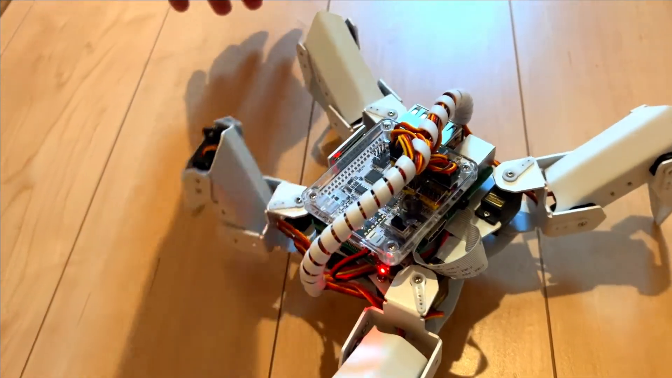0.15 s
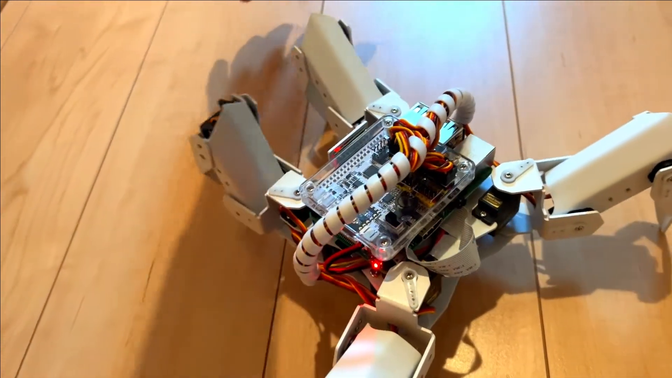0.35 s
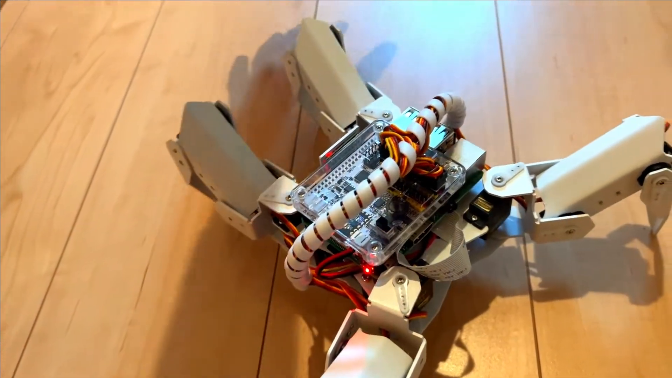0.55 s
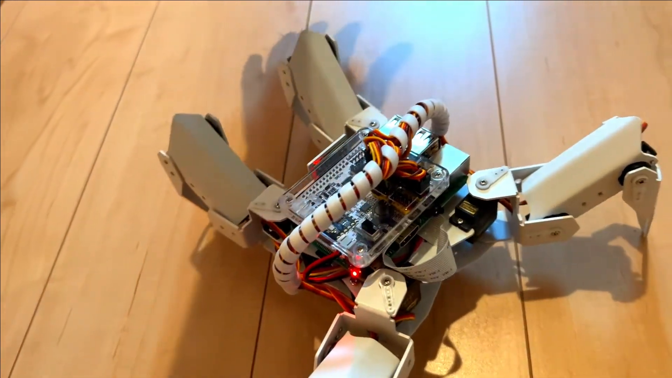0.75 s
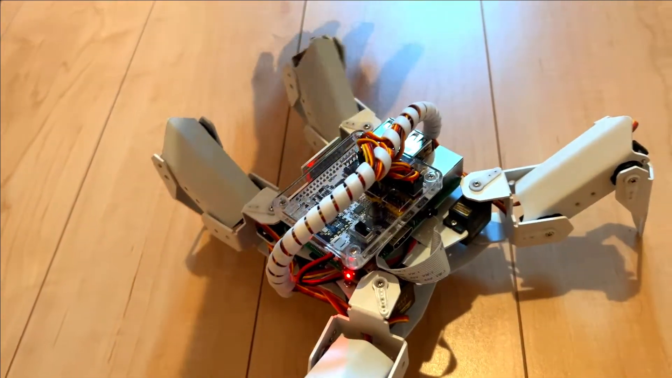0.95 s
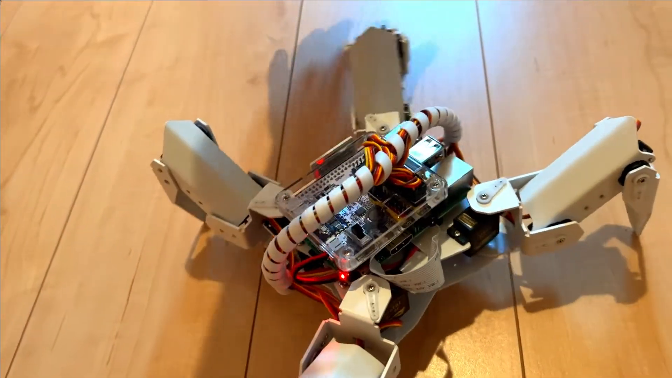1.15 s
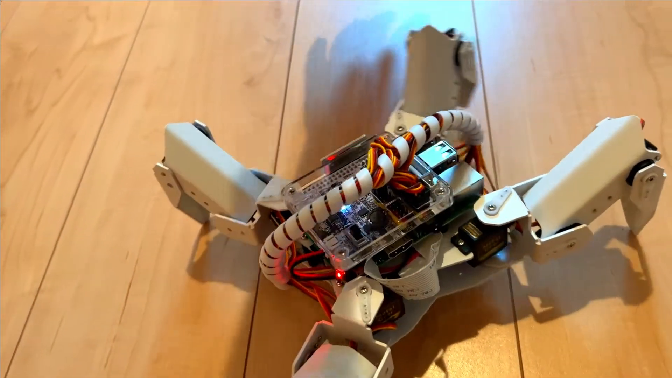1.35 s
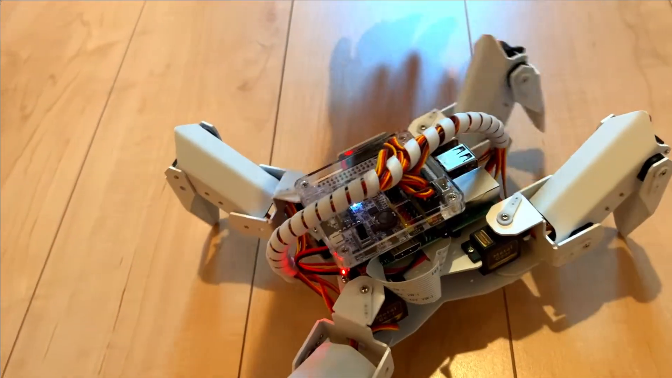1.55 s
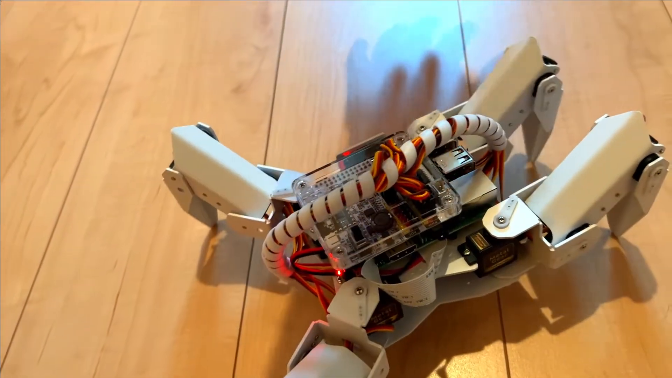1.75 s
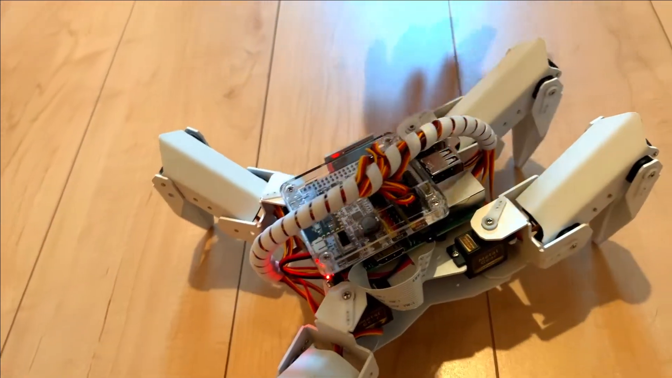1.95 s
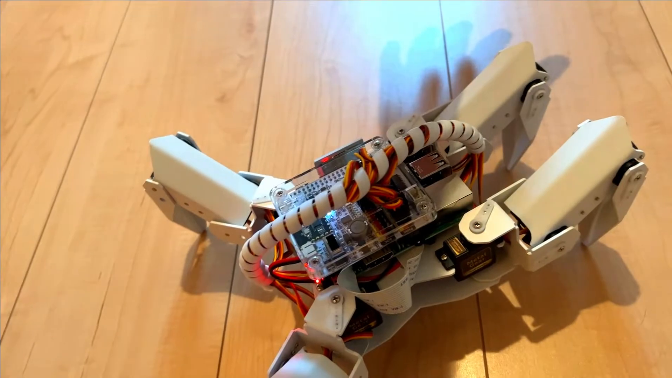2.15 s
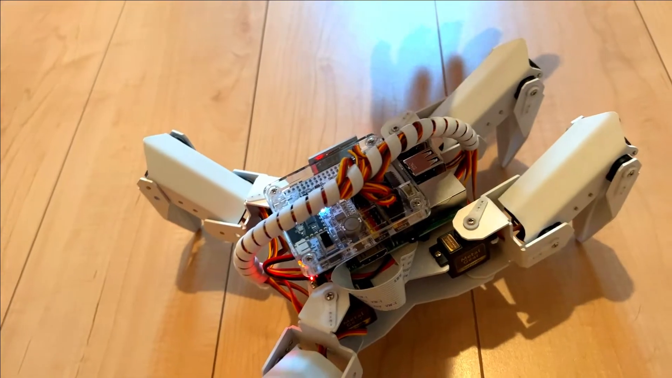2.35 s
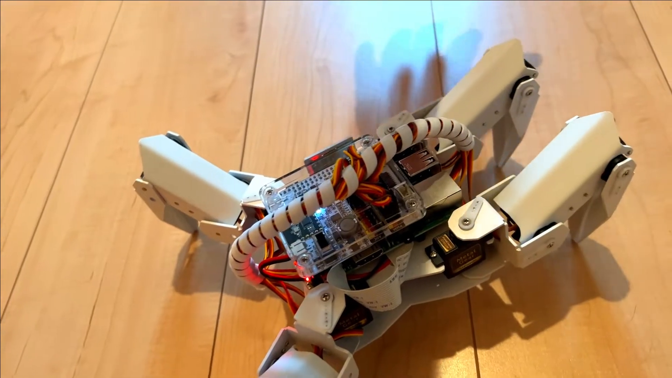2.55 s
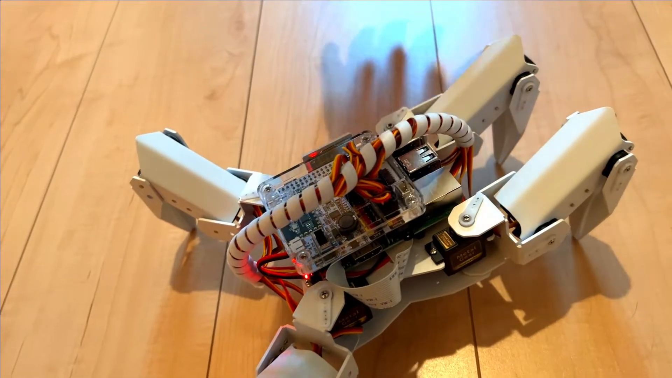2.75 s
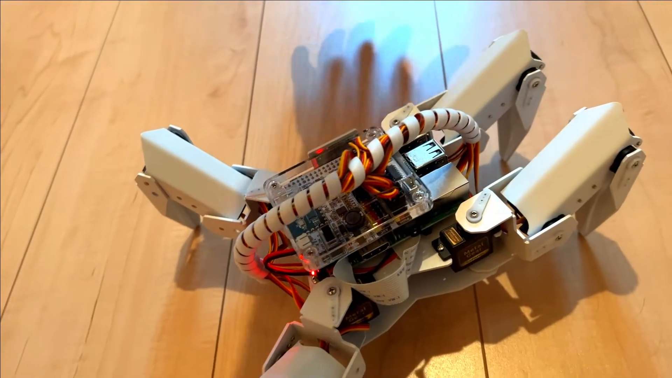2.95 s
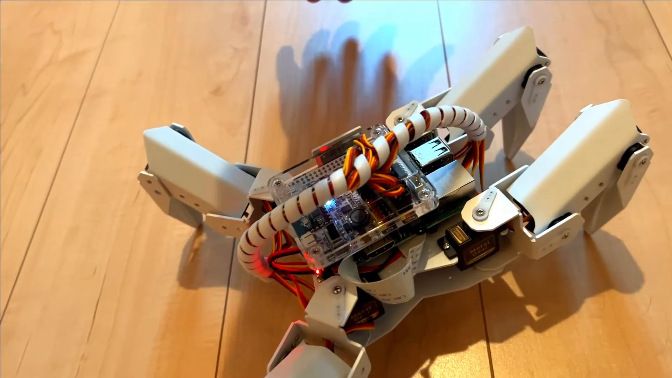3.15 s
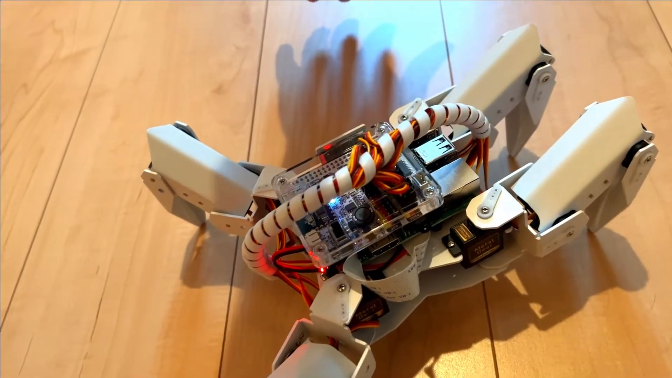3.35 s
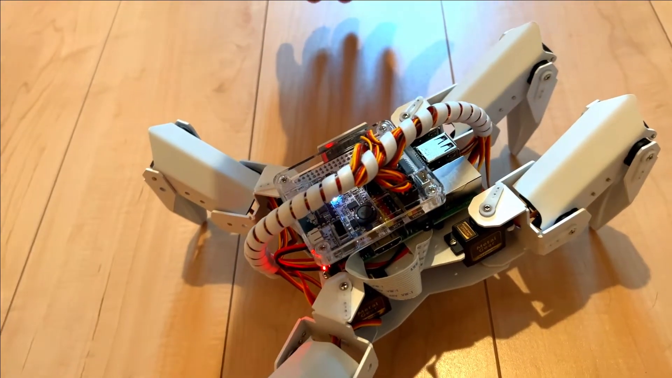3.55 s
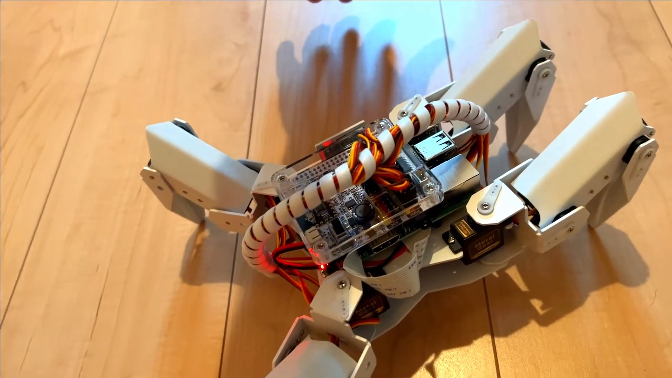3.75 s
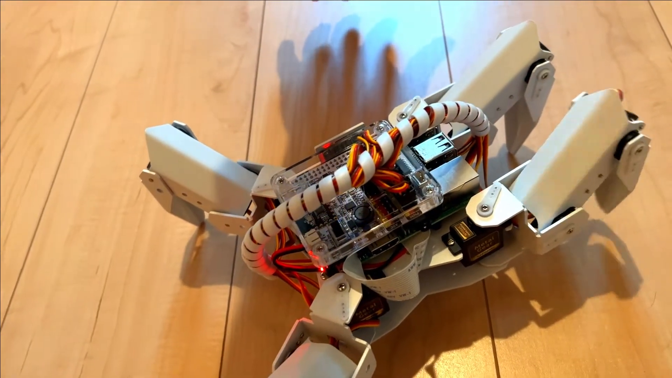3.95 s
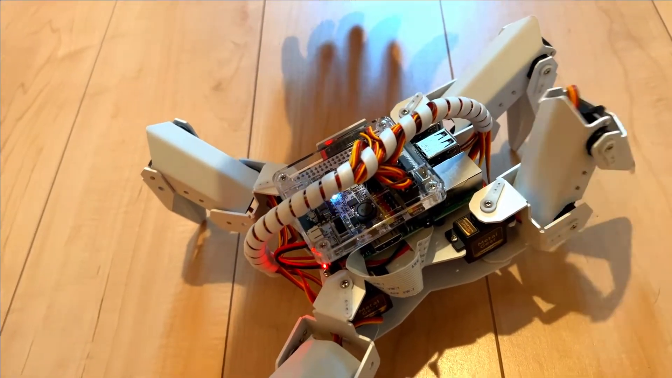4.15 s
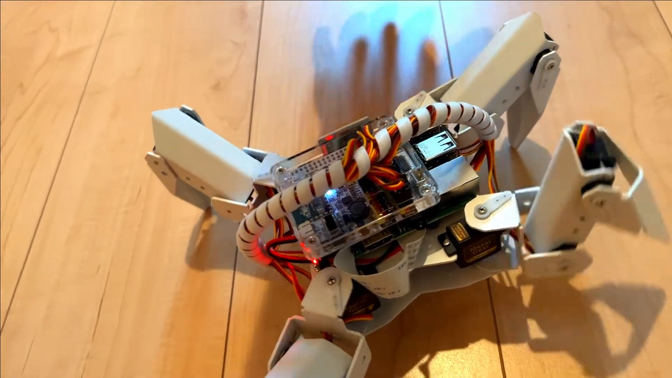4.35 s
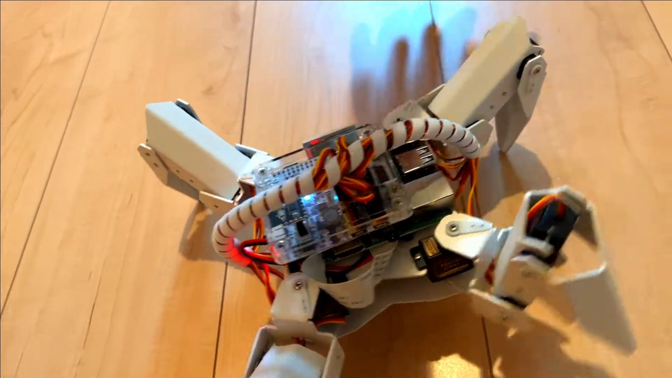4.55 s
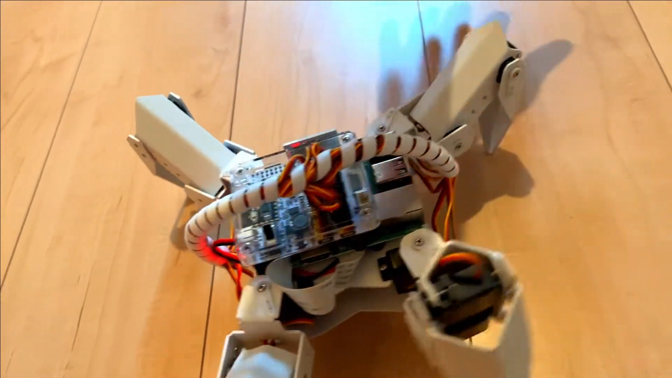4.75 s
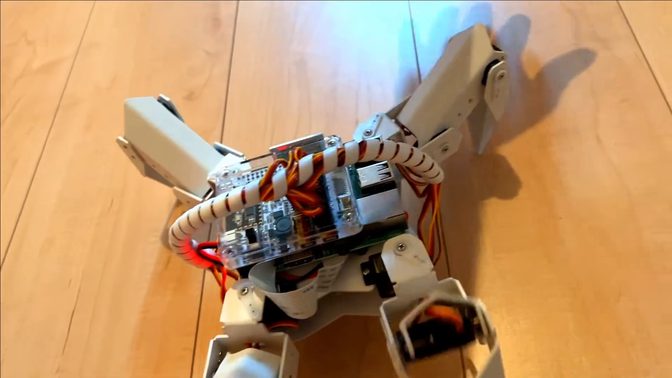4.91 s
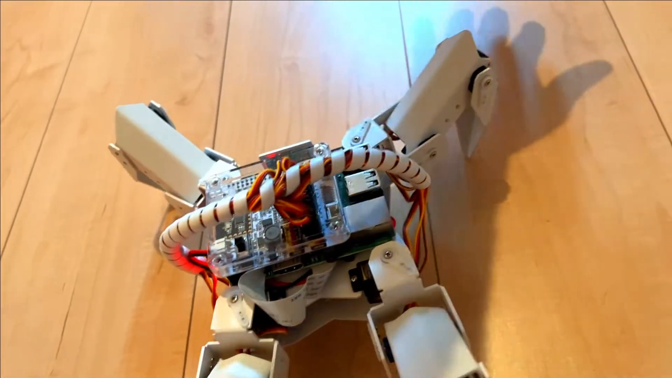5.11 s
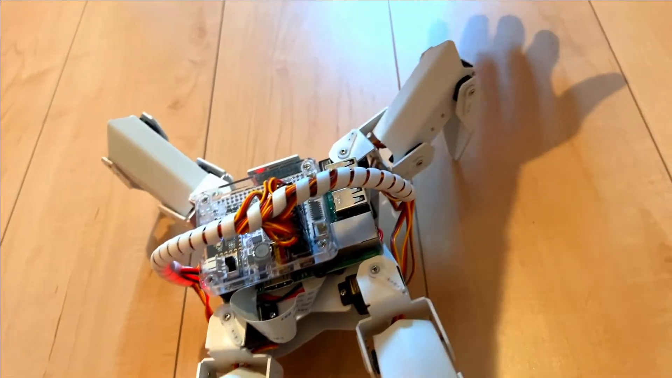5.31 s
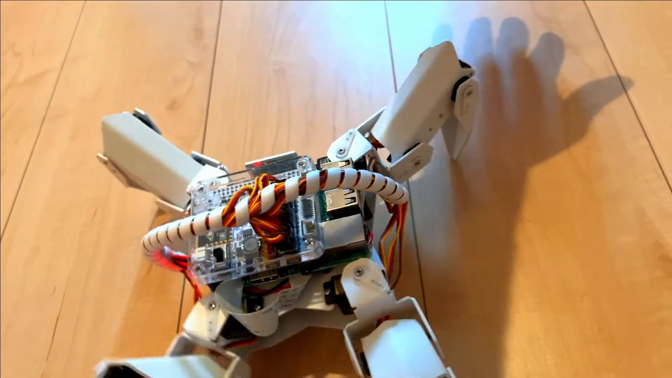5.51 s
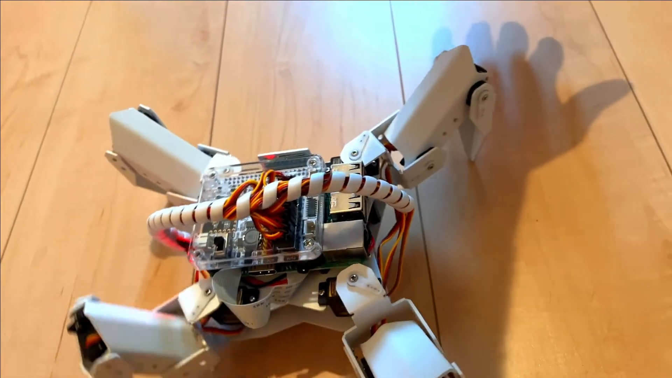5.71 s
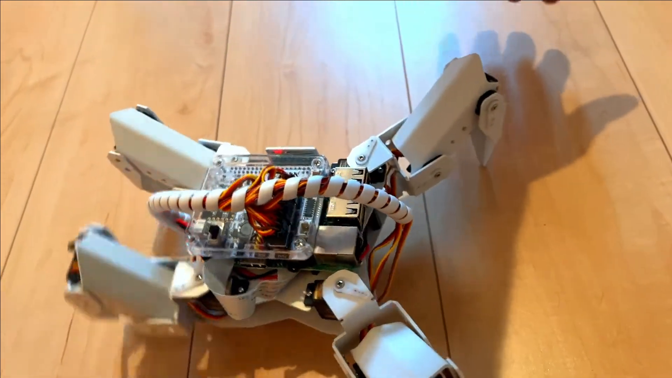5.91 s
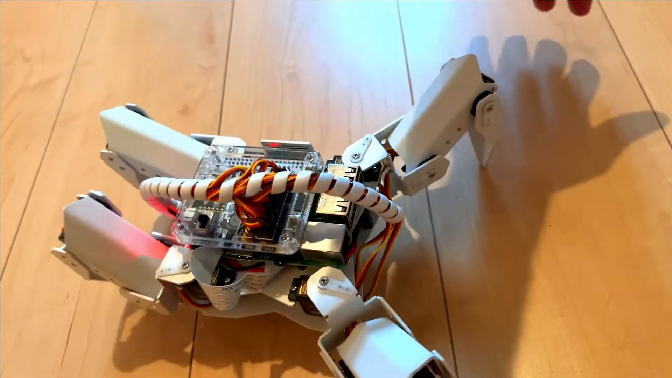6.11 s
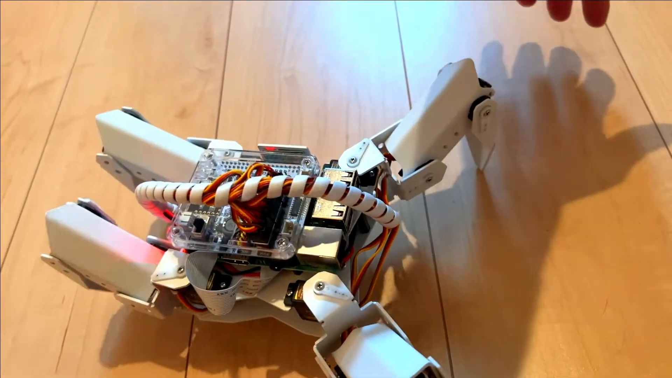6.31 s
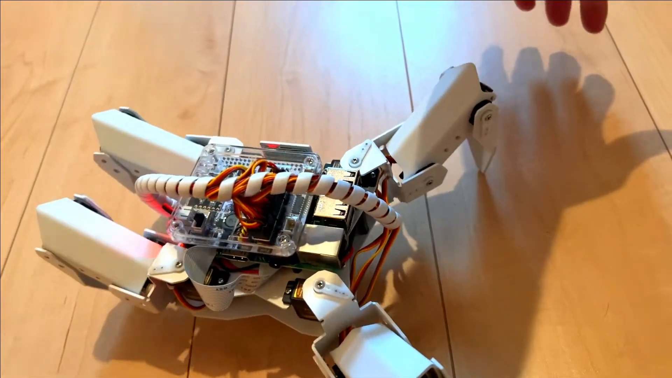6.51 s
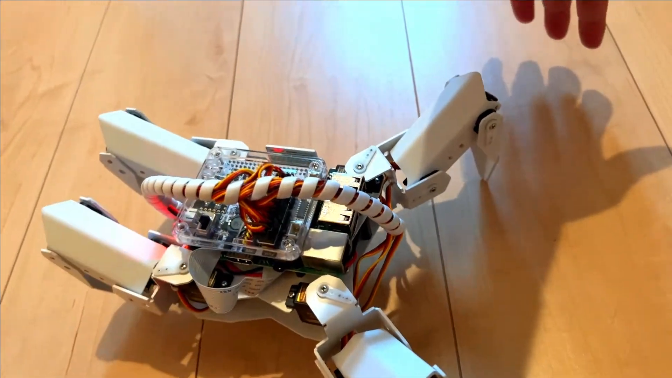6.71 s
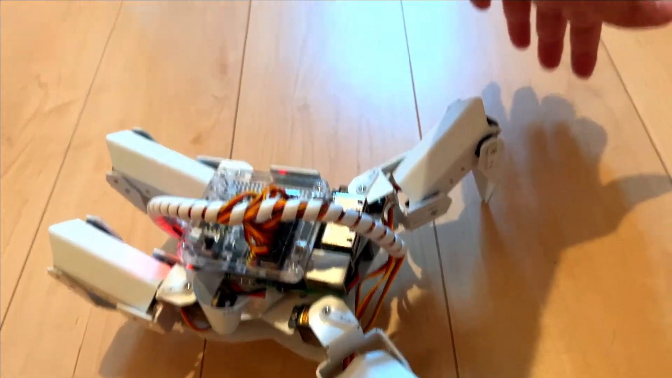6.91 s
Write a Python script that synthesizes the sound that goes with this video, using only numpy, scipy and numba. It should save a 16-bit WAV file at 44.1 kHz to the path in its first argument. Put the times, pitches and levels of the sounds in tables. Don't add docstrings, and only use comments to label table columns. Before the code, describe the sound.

Close indoor sound of hobby servos: dry, buzzing plastic gears start and stop abruptly, with clicks at each jerk. Feet skid softly and land with low woody booms and hard plastic cracks. After the first strides there is a quiet pause with a faint high-pitched electrical whine, then a slow ratcheting movement, several quick strokes, and a last few landings before near silence. Short room echo.

```python
import sys
import numpy as np
from scipy import signal
from scipy.fft import rfft, irfft, next_fast_len
from scipy.io import wavfile
from scipy.ndimage import map_coordinates
from numba import njit

SR = 44100
rng = np.random.default_rng(int(sys.argv[2]) if len(sys.argv) > 2 else 0)


def undo_db(level):
    steps = np.asarray(level, float) / 20
    return 10 ** steps


def int16_out(signal):
    q = np.round(np.clip(np.atleast_2d(signal).T, -1, 1) * 32767)
    wavfile.write(sys.argv[1], SR, q.astype(np.int16))


N = 311787
SIZE = next_fast_len(N + SR)
HZ = np.maximum(np.arange(SIZE // 2 + 1) * SR / SIZE, 1)


def rms_one(x):
    return x / np.sqrt(np.mean(x ** 2) + 1e-20)


def at_hz(points, hz):
    points = np.array(points)
    return np.interp(np.log(hz), np.log(np.maximum(points[:, 0], 1)), points[:, 1])


def colour(x, points):
    return rms_one(irfft(rfft(x, SIZE) * undo_db(at_hz(points, HZ)), SIZE)[..., :N])


def drift(rate_hz):
    knots = rng.standard_normal(600)
    coarse = map_coordinates(knots, [np.arange(0, N + 64, 64) / SR * rate_hz * 2], order=2) * 1.2
    return np.interp(np.arange(N) / 64, np.arange(len(coarse)), coarse)


def contacts(per_s, spread_db):
    sizes = undo_db(spread_db * np.minimum(rng.exponential(1, N), 4)) * rng.choice([-1, 1], N)
    return rms_one(sizes * (rng.random(N) < per_s / SR))


def ring(clicks, hz, t60_s):
    r, w = undo_db(-60 / (t60_s * SR)), 2 * np.pi * hz / SR
    return signal.lfilter([0, np.sin(w)], [1, -2 * r * np.cos(w), r * r], clicks + 1e-18)


@njit
def glide(x, pull, r):
    y = np.zeros(len(x))
    for i in range(2, len(x)):
        y[i] = x[i] - x[i - 2] + pull[i] * y[i - 1] - r * r * y[i - 2]
    return y


def housing(x, hz, width_hz):
    r = np.exp(-np.pi * width_hz / SR)
    return rms_one(glide(x, 2 * r * np.cos(2 * np.pi * hz / SR) + 0 * x, r))


def ports(x, pan_db, count):
    return np.array([x * undo_db(pan_db / 2), np.roll(x, count) * undo_db(-pan_db / 2)])


def played(rows, rise_db_per_s, fall_db_per_s):
    start, end, db, *columns = np.transpose(rows)[:, :, None]
    t = np.arange(0, N + 64, 64) / SR
    early_db = rise_db_per_s * np.maximum(start - t, 0)
    late_db = fall_db_per_s * np.maximum(t - end, 0)
    power = undo_db(2 * np.maximum(db - early_db - late_db, -140))
    total = power.sum(0)
    curves = [10 * np.log10(total)]
    curves += [(c * power).sum(0) / total for c in columns]
    return [np.interp(np.arange(N) / SR, t, c) for c in curves]


# start in s, end in s, grind in dB, low housing in Hz, high housing in Hz.
STROKES = [(0, .34, -47, 5290, 8030), (.39, .66, -46.5, 5300, 8090), (.7, .78, -46.5, 5190, 7450),
           (.88, 1.3, -46, 5160, 7800), (1.33, 1.6, -44.5, 5050, 7680), (1.68, 1.86, -44, 4740, 8120),
           (3.91, 4.2, -46, 6090, 7840), (4.23, 4.82, -49.5, 5050, 8150), (4.9, 5.08, -46.5, 6230, 7700),
           (5.12, 5.33, -48.5, 5000, 8060), (5.45, 5.66, -46, 5430, 7680), (5.7, 6.0, -44.5, 5300, 7930),
           (6.1, 6.2, -62.5, 4840, 7630), (6.25, 6.44, -60, 5700, 7380), (6.48, 6.58, -58, 5440, 7580)]
SPIN_UP_DB_PER_S, SPIN_DOWN_DB_PER_S = 641.5, 129.5
# start in s, end in s, relative level in dB.
SHELL = [
    (0, 1.6, -5),
    (1.65, 3.1, -4),
    (3.85, 5, 7),
    (4.9, 4.82, 6),
    (5.45, 6.9, -2),
    (6.2, 6.4, 7),
]
# frequency in Hz, level in dB per Hz.
GEAR_BODY = [(1500, -43), (2600, -10.5), (3700, -4.5), (5200, -0.5), (6900, -0.5), (8000, -2), (9200, 2.5),
             (10500, -28), (13000, -47)]
# frequency in Hz, level in dB per Hz.
FIZZ_BODY = [(8500, -30), (10000, -1), (11200, 1), (12600, -1), (13400, -14), (15900, -40)]
# frequency in Hz, level in dB per Hz.
FIZZ_TOP = [(12300, -25), (13300, 0), (14200, -3), (15500, -2), (15900, -28)]
# frequency in Hz, relative level in dB.
PANELS = [(1950, -33), (3300, -28), (3600, -23), (4130, -25), (4730, -20), (5160, -19), (5600, -20),
          (6100, -20), (6600, -22), (7350, -20), (8150, -19), (8550, -21)]
FULL_GRIND_DB, FIZZ_STOPS_DB = -46.5, -13


def gears():
    grind_db, low_hz, high_hz = played(STROKES, SPIN_UP_DB_PER_S, SPIN_DOWN_DB_PER_S)
    shell_db, = played(SHELL, 150, 150)
    swing_db = grind_db - FULL_GRIND_DB
    slack_db = np.clip(swing_db, -25, 0)
    torque, out = jerks()
    effort = np.hypot(undo_db(grind_db - 7.5 + 1.0 * drift(22)), 0.5 * torque)
    teeth = [contacts(3000, 1.8) for servo in range(3)]

    out += effort * undo_db(-0.5) * ports(colour(contacts(5000, 1.9), GEAR_BODY), .4, count=0)
    low = housing(teeth[0], low_hz, width_hz=260)
    out += effort * undo_db(-8 + 3.0 * drift(14)) * ports(low, 1.5, count=1)
    high = housing(teeth[1], high_hz, width_hz=350)
    out += effort * undo_db(-9 + 0.4 * slack_db + 3.0 * drift(14)) * ports(high, -.5, count=0)
    shell = housing(housing(teeth[2], 2300, width_hz=820), 2240, width_hz=600)
    shell_db = shell_db - 22 - 0.3 * slack_db + 3.1 * drift(4.0)
    out += effort * undo_db(shell_db) * ports(shell, -0.5, count=2)

    fizz_db = np.minimum(-5 - 0.44 * swing_db, 1.5) + 2 * np.minimum(slack_db - FIZZ_STOPS_DB, 0)
    out += effort * undo_db(fizz_db) * ports(colour(contacts(4000, 6.0), FIZZ_BODY), .1, count=0)
    top_db = -7 + 1.6 * slack_db + 3.0 * drift(6.7)
    out += effort * undo_db(top_db) * ports(colour(contacts(5500, 4.2), FIZZ_TOP), .1, count=0)

    for k, (hz, db) in enumerate(PANELS):
        wander_hz = hz * (1 + 0.014 * drift(5.5))
        panel = housing(teeth[k % 3], wander_hz, width_hz=70)
        out += effort * undo_db(db + 4 + 4.5 * drift(25)) * ports(panel, .5, count=(hz < 6000) * (k % 3))
    return out


# time in s, peak in dB, housing in Hz.
JERKS = [(0.0318, -41.5, 5970), (0.192, -44, 4600), (0.378, -39, 5800), (0.4294, -33, 5300),
         (0.5074, -36, 5170), (0.6484, -37.5, 7840), (0.8934, -37.5, 5100), (0.9812, -30.5, 7740),
         (1.0236, -30.5, 7550), (1.1258, -36, 7260), (1.1538, -43, 5230), (1.3094, -35.5, 7740),
         (1.3848, -46, 5470), (1.6402, -40.5, 4240), (1.701, -36.5, 4460), (1.8672, -39, 5630),
         (4.0392, -40.5, 5340), (4.2353, -36, 8200), (4.9132, -38.5, 4070), (4.9791, -34, 4200),
         (5.0429, -37.5, 4150), (5.47, -34, 7390), (5.5203, -34.5, 6160), (5.6326, -34, 8050),
         (5.7229, -36.5, 6800), (5.7693, -36, 8100), (5.8194, -32, 8260), (5.8914, -31, 8560)]
# time in s, peak in dB, low and high housing in Hz.
STUTTERS = [(4.282, -49, 4760, 8600), (4.3291, -38, 4950, 7960), (4.3739, -38.5, 4640, 8200),
            (4.4159, -39.5, 4940, 8300), (4.4594, -53, 5480, 7580), (4.5, -39, 5600, 8080),
            (4.5462, -48, 5460, 8200), (4.5846, -38.5, 5030, 8380), (4.6264, -42.5, 5300, 7640),
            (4.6645, -38.5, 6260, 7860), (4.708, -41.5, 5520, 7650), (4.7506, -36.5, 5900, 7400),
            (4.796, -38.5, 5300, 7500)]


def jerks():
    commands = list(JERKS)
    commands += [(s, db, hz) for s, db, *housings in STUTTERS for hz in housings]
    torque, out, t = np.zeros(N), np.zeros((2, N)), np.arange(SR // 8) / SR
    for s, db, hz in commands:
        i = round((s - .003) * SR)
        swell = undo_db(db - 15.0) * t / 0.0039 * np.exp(1 - t / 0.0062)
        rattle = housing(rng.standard_normal(len(t)), hz, width_hz=130)
        torque[i:i + len(t)] += swell
        out[:, i:i + len(t)] += undo_db(-0.5) * swell * ports(rattle, 1.8, count=0)
    return torque, out


# start in s, end in s, rumble in dB, chassis and leg scrape in dB relative to it.
DRAGS = [(0, .1, -40, -7.5, -17.5), (.15, .36, -45.5, -6.5, -17.5), (.52, .66, -62, -1.5, -5),
         (.85, .9, -55.5, -2.5, -9), (1.0, 1.09, -45, -8.5, -24), (1.15, 1.22, -52.5, -5.5, -17),
         (1.38, 1.51, -41, -6.5, -17), (1.53, 1.65, -39, -7.5, -15), (1.9, 1.97, -46.5, -21, -14),
         (3.91, 4.06, -74.5, 16.5, 2.5), (4.09, 4.2, -73.5, 13.5, 3), (4.25, 4.31, -48.5, -1, -10),
         (4.36, 4.5, -46, -6, -17.5), (4.55, 4.74, -44.5, -10, -21.5), (4.8, 4.9, -48.5, -9.5, -27.5),
         (5.1, 5.18, -58.5, -1.5, -10.5), (5.4, 5.55, -57, -2.5, -6), (5.62, 5.71, -47, -8.5, -26),
         (5.76, 5.81, -54, -7, -27), (5.86, 5.89, -57, -5, -14), (5.91, 5.935, -51, 3, -5),
         (5.98, 6.05, -45, -6, -17), (6.4, 6.54, -46.5, -8, -23.5), (6.6, 6.64, -61.5, -5, -12)]
# frequency in Hz, level in dB, t60 in s.
SKID_BOARDS = [(163, -9.5, 0.24), (208, -4.5, 0.2), (230.3, -9.5, 0.14), (274, -6.5, 0.084)]
# frequency in Hz, level in dB, t60 in s.
SKID_CHASSIS = [(330, -5, 0.071), (394.5, 0, 0.055), (420, -2, 0.052), (477, -7.5, 0.013),
                (570, -8.5, 0.02)]
# frequency in Hz, level in dB, t60 in s.
SKID_LEG = [(694, -3.5, 0.062), (924, 2, 0.032), (1014, -3.5, .05), (1071, -7, .05), (1270, -7.5, .04),
            (1440, -11.5, 0.052)]
GRIP_DB_PER_S, SLIP_OFF_DB_PER_S = 297.5, 218.5


def dragging():
    rumble_db, chassis_db, scrape_db = played(DRAGS, GRIP_DB_PER_S, SLIP_OFF_DB_PER_S)
    slips, out = contacts(2500, 1.8), 0
    dealt = rng.integers(0, len(SKID_LEG), N)
    for modes, rel_db in ((SKID_BOARDS, 0), (SKID_CHASSIS, chassis_db), (SKID_LEG, scrape_db)):
        body = 0
        for k, (hz, db, t60_s) in enumerate(modes):
            body = body + undo_db(db) * ring(slips * (dealt == k), hz, t60_s)
        out = out + undo_db(rel_db) * rms_one(body)
    return undo_db(rumble_db - 3.5 + 2.0 * drift(15)) * out


DRIVER_HZ = [15630, 15610, 15619, 15689, 15674]
# start in s, end in s, level in dB.
LOADS = [
    [(0, 2.3, -74), (1.95, 1.5, -60.5), (2.4, 2.7, -59.5), (3.15, 4.4, -59.5), (4.4, 5, -60),
     (5.35, 6.1, -59), (6.1, 6.7, -64.5), (6.8, 6.8, -67)],
    [(2.2, 3.2, -63.5), (3.3, 4.17, -63.5), (5.9, 6.1, -67.5)],
    [(0, .4, -65), (.95, 1.46, -57), (1.55, 2.0, -57), (5.4, 5.7, -59.5), (6.05, 6.4, -61), (6.8, 7.1, -57)],
    [(0, .8, -69), (.88, 1.35, -62.5), (3.9, 5.1, -66), (5.35, 6.55, -63.5), (6.8, 7.1, -75)],
    [(1.5, 1.93, -70), (2.0, 3.0, -77.5)],
]
LOAD_ON_DB_PER_S, LOAD_OFF_DB_PER_S = 57.5, 57


def drivers():
    tones = 0
    for hz, loads in zip(DRIVER_HZ, LOADS):
        db, = played(loads, LOAD_ON_DB_PER_S, LOAD_OFF_DB_PER_S)
        phase = 2 * np.pi * np.cumsum(hz + 0.87 * drift(3)) / SR
        tones = tones + np.sqrt(2) * undo_db(db + 8.0 + 1.1 * drift(6)) * np.sin(phase)
    haze = housing(housing(rng.standard_normal(N), 15640, width_hz=300), 15640, width_hz=300)
    grind_db = played(STROKES, SPIN_UP_DB_PER_S, SPIN_DOWN_DB_PER_S)[0]
    return ports(tones + (undo_db(grind_db - 14) + undo_db(-81.0)) * haze, 0, count=0)


# frequency in Hz, level in dB per Hz.
HUM = [(12, -48.5), (30, -8.5), (85, -2), (300, -18.5), (324, -15), (369, -13.5), (602, -29.5),
       (667, -29.5), (1300, -34), (10500, -49.5), (12400, -69), (20900, -120)]
# frequency in Hz, likeness from 0 to 1.
HUM_LIKENESS = [(60, .9), (290, 0.77), (640, .38), (1400, 0.11), (15000, .1)]
HUM_DB = -64.5


def hum():
    alike = np.clip(at_hz(HUM_LIKENESS, HZ), 0, 1)
    mid, side = rfft(rng.standard_normal((2, SIZE)))
    pair = irfft(np.sqrt(1 + alike) * mid + np.sqrt(1 - alike) * side * [[1], [-1]], SIZE)[:, :N]
    rumble = undo_db(HUM_DB + 1.0) * colour(pair, HUM)
    appliance = undo_db(-82.5) * housing(pair[0], 600, width_hz=7.9)
    hiss = undo_db(-100) * rng.standard_normal((2, N))
    hiss += undo_db(-107 + 5.3 * drift(8)) * housing(rng.standard_normal(N), 12200, width_hz=900)
    return rumble + appliance + hiss


# time in s, frequency in Hz, level in dB, t60 in s.
NOTES = [(.308, 416, -35, 0.092), (.312, 1005, -44.5, 0.034), (.32, 208, -40, 0.23),
         (0.985, 210.4, -37.5, 0.42), (.998, 217, -29, 0.19), (1.78, 1007, -31, 0.084),
         (1.782, 168.6, -29, 0.28), (1.783, 330, -46, 0.089), (1.784, 3320, -39.5, 0.037),
         (5.945, 997, -37, 0.08), (.694, 201.6, -24, 0.29), (.713, 208, -19.5, .2),
         (0.707, 1040, -34, 0.041), (1.778, 480, -27, 0.037), (1.779, 1490, -31, 0.024),
         (1.892, 672, -35, 0.032), (5.201, 1009, -19, 0.029), (5.202, 730, -25, 0.027),
         (5.204, 417, -24.5, 0.073), (.7, 163, -30.5, 0.13), (.72, 598.7, -39.5, 0.13),
         (5.201, 2260, -28, 0.016), (5.202, 339, -29, 0.15), (5.212, 200.2, -29.5, 0.19),
         (5.941, 1046, -23, 0.034), (5.941, 428, -23, 0.055), (5.953, 210, -38, 0.15),
         (6.307, 214.3, -24.5, 0.29), (6.306, 255, -21, 0.06), (6.315, 620, -39.5, .06),
         (6.372, 230, -34.5, 0.2), (6.554, 280, -30, 0.054), (6.562, 392, -38, 0.076),
         (6.58, 206, -34.5, 0.09)]
# frequency in Hz, left minus right in dB.
NOTE_PAN = [(200, 2.5), (700, 5.5), (1300, -8), (2400, 0)]


def notes():
    out = np.zeros((2, N))
    for s, hz, db, t60_s in NOTES:
        i = round(s * SR)
        tone = undo_db(db) * ring(np.arange(SR // 2) == 0, hz, t60_s)
        out[:, i:i + len(tone)] += ports(tone[:N - i], at_hz(NOTE_PAN, hz), count=0)
    return out


# time in s, boards in dB, then chassis, leg knock and tip crack in dB relative to them.
STEPS = [(0.313, -38.5, -7, -15, -28), (0.693, -21, -6, -11.5, -1), (0.712, -30.5, -5.5, -5, -2),
         (0.984, -38, -10, -28, -5), (1.778, -27, -4.5, 2, -1.5), (1.892, -43, 0.5, 0, -20),
         (4.245, -46.5, 3, -6, -26), (4.61, -35.5, -6.5, -21.5, -7), (5.2, -23, -7, 0, 6),
         (5.629, -51.5, -1, -10, -18), (5.756, -37, -13, -21, -30), (5.94, -40, 5.5, 10, 11.5),
         (6.254, -50.5, -2, -11, 0), (6.304, -24, -8.5, -8, -11), (6.378, -36.5, -5, -9.5, -15),
         (6.557, -37, -8, -17, -10), (0.734, -31, -9.5, -26, -36)]
# frequency in Hz, level in dB, t60 in s.
BOARDS = [(165.8, -13, 0.34), (207.4, -9.5, 0.33), (227.4, -7.5, 0.14), (295, -11.5, 0.073)]
# frequency in Hz, level in dB, t60 in s.
CHASSIS = [(303.4, -3.5, 0.25), (347, 5, 0.073), (400.4, 4, 0.1), (426.8, -1.5, 0.13), (450, -18, 0.061)]
# frequency in Hz, level in dB, t60 in s.
LEG = [(557, -10, 0.16), (638, -5.5, 0.053), (862, 5.5, 0.024), (936, 2, 0.035), (985, -6, 0.013),
       (1112, -1, 0.027), (1236, -4, 0.045), (1390, -2.5, 0.025), (1510, -16, 0.024), (2000, -9.5, 0.022),
       (2130, -26.5, 0.017)]
# frequency in Hz, level in dB, t60 in s.
TIP = [(2630, -10, .008), (3300, -7, .01), (4150, -3, .01), (5300, -7, .008), (6400, -6, .007),
       (7900, -5, .009), (9000, -4, .008), (12500, -4, .007), (14600, -5, .006)]
HARD_LANDING_DB = -29
DULLING_PER_OCTAVE = .35


def steps():
    rows, out = np.array(STEPS), []
    time_s, board_db, chassis_db, leg_db, tip_db = rows.T
    shortfall_db = np.minimum(board_db + tip_db - HARD_LANDING_DB, 0)
    for modes, rel_db, soft_hz, trim_db, wait_s, pan_db in (
            (BOARDS, 0, 300, 1.5, .003, 1.9), (CHASSIS, chassis_db, 900, -4.5, .002, .6),
            (LEG, leg_db, 3000, -5.5, .0008, -.6), (TIP, tip_db, 15000, -4.5, .001, -.3)):
        body = 0
        for hz, db, t60_s in modes:
            clicks, luck = np.zeros((2, N)), rng.random((len(rows), 4))
            at = ((time_s + wait_s + 0.0017 * luck[:, 0] - .001) * SR).astype(int)
            dull_db = DULLING_PER_OCTAVE * shortfall_db * max(np.log2(hz / 5000), 0)
            size_db = board_db + rel_db + db + trim_db + dull_db + 3.0 * luck[:, 1]
            size = undo_db(size_db) * np.sign(luck[:, 2] - .3)
            side_db = pan_db + 2.5 * (luck[:, 3] - .5)
            clicks[:, at] = size * undo_db(np.outer([.5, -.5], side_db))
            body = body + ring(clicks, hz, t60_s)
        out.append(signal.lfilter(*signal.butter(1, soft_hz, fs=SR), body))
    return out


# frequency in Hz, level in dB per Hz.
SLAP = [(150, -13.5), (500, -4), (750, 1.5), (1100, -8), (1600, -7.5), (2300, -19), (3500, -15.5),
        (7000, -17.5)]


def slaps():
    puff, t = np.zeros(N), np.arange(SR // 20) / SR
    for s, db, chassis_db, leg_db, tip_db in STEPS:
        puff[round(s * SR):][:len(t)] += undo_db(db + leg_db - 9) * np.exp(-t / 0.0042)
    return puff * colour(rng.standard_normal(N), SLAP)


# start in s, length in s, frequency in Hz, level in dB, fade in dB.
WHINES = [(.643, .04, 2000, -53, 10), (.643, .04, 2950, -56, 10), (.643, .04, 3950, -53, 8),
          (.643, .04, 4900, -52, 8), (.51, .03, 4500, -52, 6), (1.735, .03, 2400, -59, 4),
          (1.62, .28, 4370, -55, 6), (1.69, .5, 4650, -55, 27), (1.85, .35, 4350, -66, 20),
          (2.25, .17, 3950, -82, 2), (4.86, .24, 4180, -59, 0), (6.72, .33, 3400, -90, 2),
          (.95, .6, 7650, -56, 3), (.88, .4, 5280, -57, 0), (1.33, .27, 5350, -56, 0),
          (.36, .2, 5400, -56, 2), (3.9, .3, 5950, -57, 2), (1.75, .17, 5750, -56, 3),
          (4.1, .12, 4900, -62, 0), (6.3, .1, 2800, -68, 6)]
SAG_PER_S, WHINE_WIDTH_HZ = .04, 90


def whines():
    out, flicker_db = np.zeros(N), 2.5 * drift(40) - 1.0
    for start_s, length_s, hz, db, fade_db in WHINES:
        i, t = round(start_s * SR), np.arange(round(length_s * SR)) / SR
        tone = housing(rng.standard_normal(len(t)), hz * (1 - SAG_PER_S * t), WHINE_WIDTH_HZ)
        level = undo_db(db - fade_db * t / length_s) * signal.windows.tukey(len(t), .4)
        out[i:i + len(t)] += level * tone
    return ports(out * undo_db(flicker_db), 0.3, count=1)


# frequency in Hz, t60 in s.
ROOM_T60 = [(100, 0.26), (500, 0.59), (2000, 0.48), (6000, 0.38), (9000, 0.17), (16000, 0.048)]
ROOM_DB, FIRST_WALL_S = -29, 0.0049


def room(x):
    hz, s, cells = signal.stft(rng.standard_normal((2, SR // 2)), SR, nperseg=256)
    decay_db = ROOM_DB - 60 * s / at_hz(ROOM_T60, np.maximum(hz, 1))[:, None]
    echo = signal.istft(cells * undo_db(decay_db), SR, nperseg=256)[1]
    echo *= np.arange(echo.shape[1]) > FIRST_WALL_S * SR
    return signal.oaconvolve(x[None], echo, axes=1)[:, :N]


def scene():
    grind = gears() + whines()
    skid, note, slap = dragging(), notes(), slaps()
    boards, chassis, legs, tips = steps()
    sent = undo_db(-6.0) * boards + undo_db(-8.5) * chassis + undo_db(-3.5) * legs + undo_db(-8) * tips + undo_db(-5.5) * grind
    left, right = room(sent.mean(0) + undo_db(-7.0) * note.mean(0) + undo_db(-5) * skid + undo_db(7) * slap)
    apart = signal.lfilter(*signal.butter(1, 330, "high", fs=SR), left - right)
    echoes = (left + right + apart * [[1], [-1]]) / 2
    robot = grind + boards + chassis + legs + tips + slap + note + ports(skid, 1.2, count=0) + echoes
    bass_cut = signal.butter(6, 125, "high", fs=SR, output="sos")
    return signal.sosfilt(bass_cut, robot) + drivers() + hum()


def roll_off(x):
    return signal.sosfilt(signal.butter(12, 16690, fs=SR, output="sos"), x)


# frequency in Hz, left lead in radians.
PORT_PHASE = [(200, 0), (1100, .6), (2200, .3), (4000, .5), (8000, 1.2), (9300, 2.5), (9850, 3.1),
              (10600, 3.1), (11200, 2.3), (12600, .4), (14400, -.35), (15300, -2.2)]


def record(dry):
    turn = np.exp(-1j * np.outer([0, 1], at_hz(PORT_PHASE, HZ)))
    top = undo_db(at_hz([(15850, 0), (16200, -60)], HZ))
    heard = irfft(rfft(dry, SIZE) * turn * top, SIZE)[:, :N]
    return roll_off(heard)


dry = scene()
out = record(dry)
int16_out(out)
```